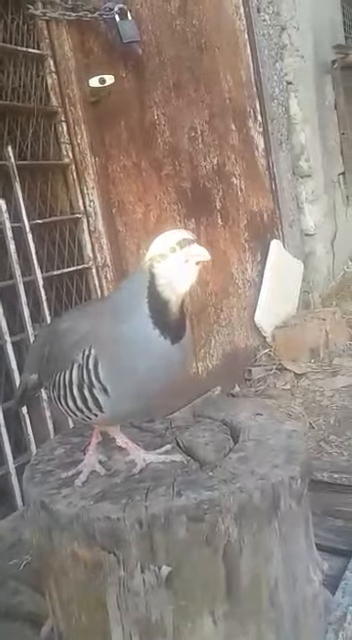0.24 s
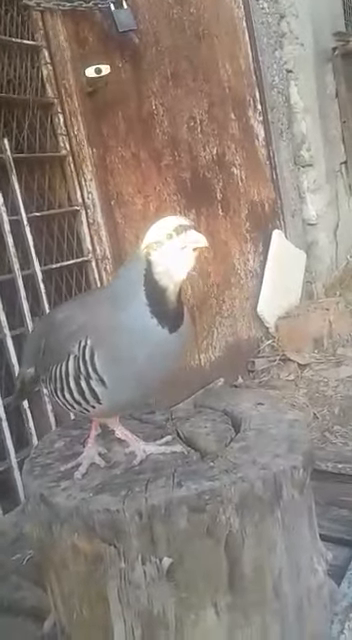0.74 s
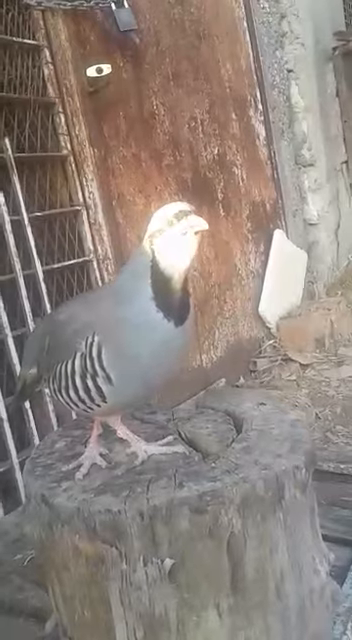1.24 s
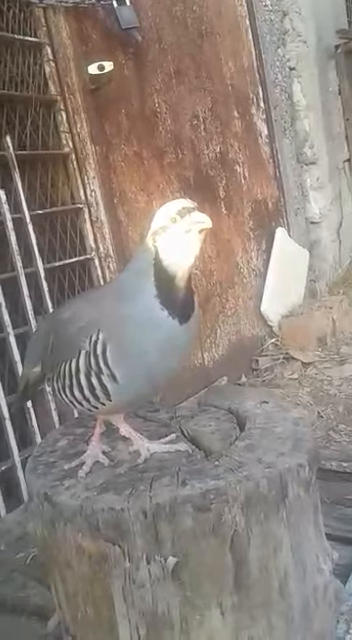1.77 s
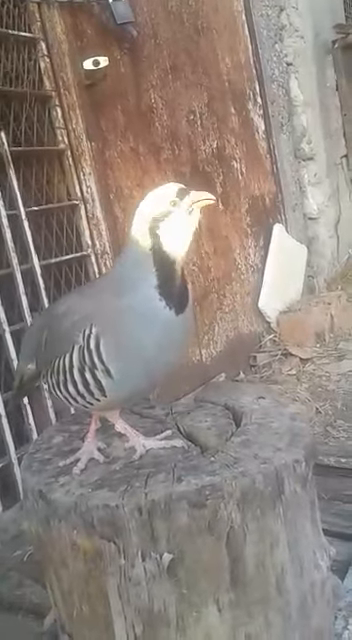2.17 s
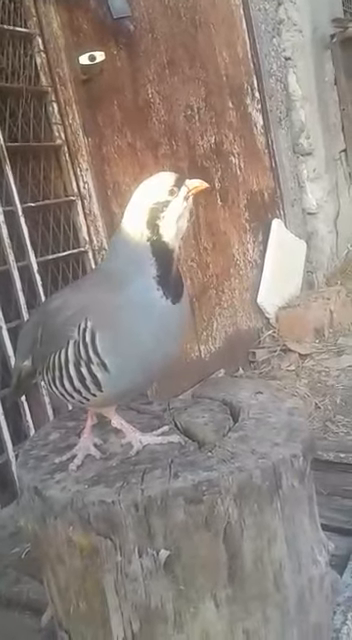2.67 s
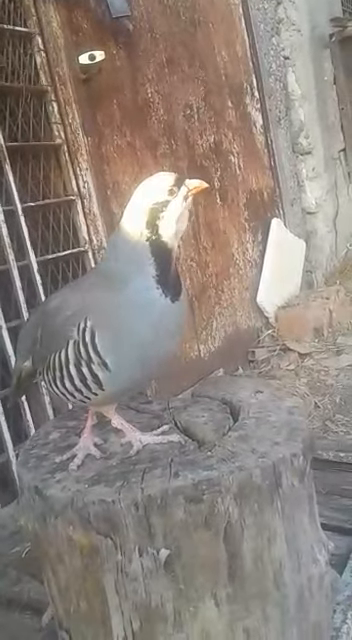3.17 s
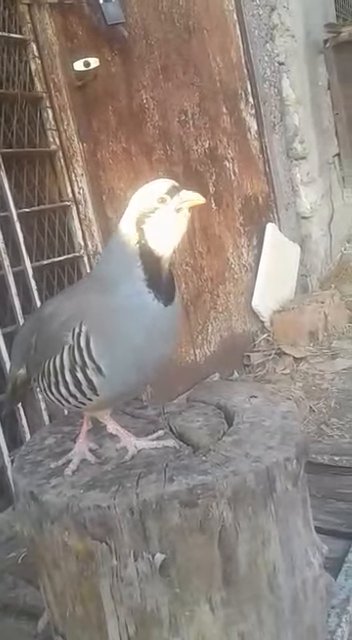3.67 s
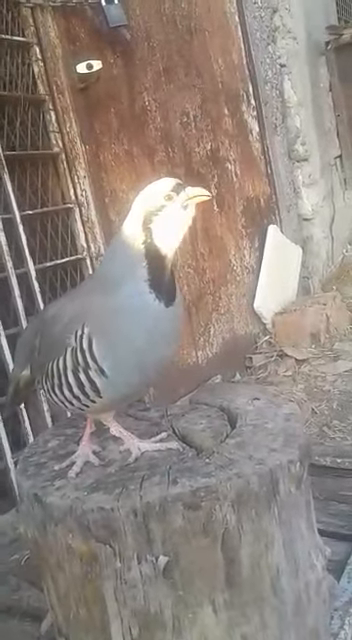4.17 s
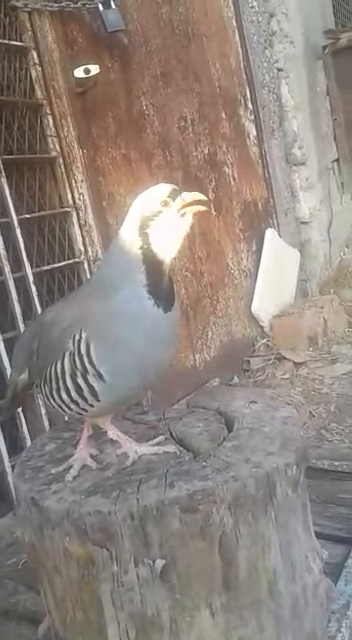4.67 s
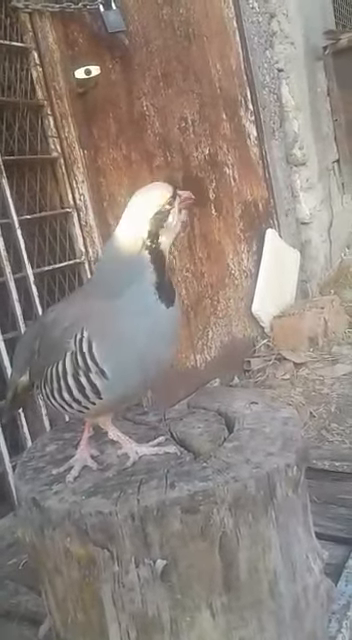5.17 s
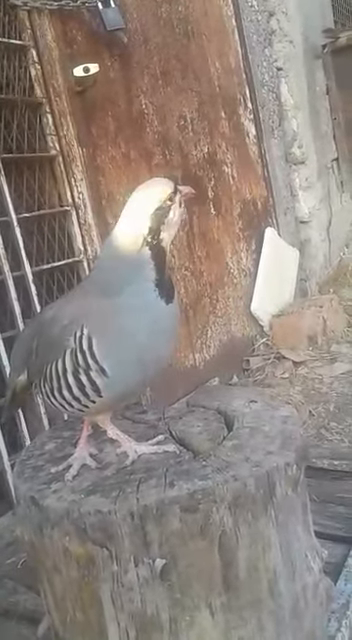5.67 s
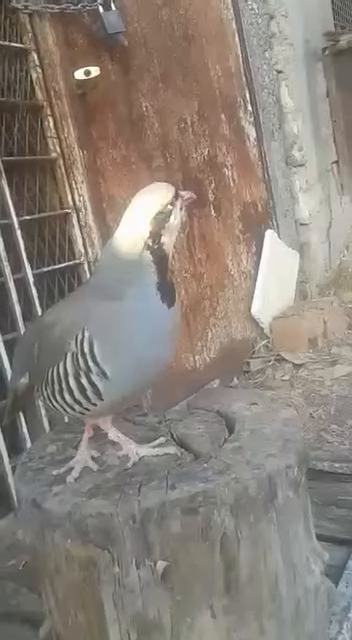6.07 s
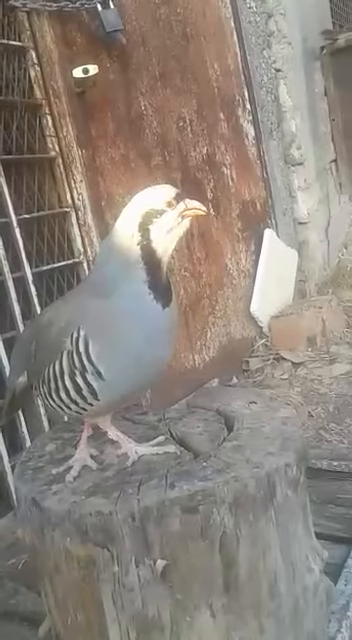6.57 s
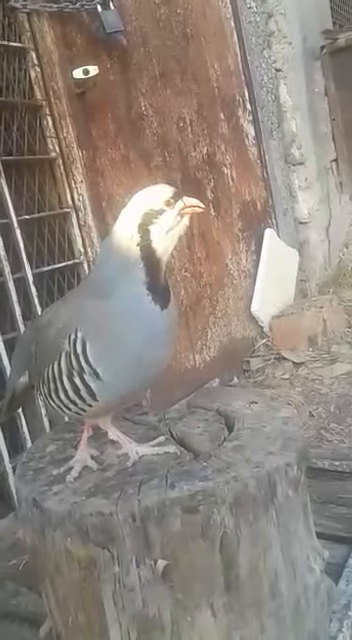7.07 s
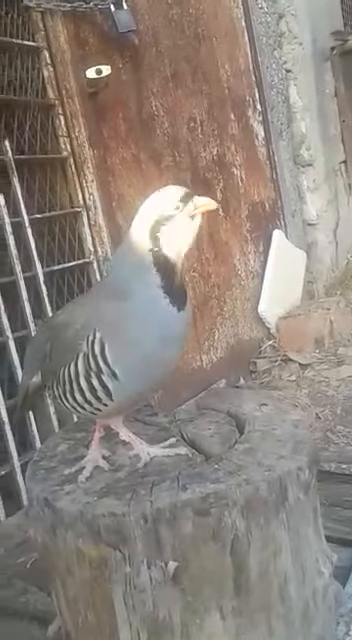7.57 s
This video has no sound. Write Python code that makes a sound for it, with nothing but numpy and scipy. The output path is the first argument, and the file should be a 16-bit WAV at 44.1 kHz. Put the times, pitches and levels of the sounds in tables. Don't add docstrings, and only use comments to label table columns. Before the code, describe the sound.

A partridge on a stump close to the microphone calls throughout: a soft hoot, then repeating groups of low cluck, swelling throaty roll and sharp cracked kick, broken twice by rows of clear, even chucks. A hoarse bird rasps in the distance, mostly in the first half. A hinge creaks faintly midway and thin chirps come later. The small walled yard echoes briefly above traffic rumble and far engines, with one knock on the microphone near the end.

```python
import sys
import numpy as np
from scipy import signal
from scipy.io import wavfile
from scipy.ndimage import uniform_filter1d

SR = 44100
rng = np.random.default_rng(int(sys.argv[2]) if len(sys.argv) > 2 else 0)


def put_to_file(sound):
    columns = np.atleast_2d(sound).T
    safe = np.clip(columns, -1, 1)
    whole_steps = np.round(safe * 32767)
    wavfile.write(sys.argv[1], SR, whole_steps.astype(np.int16))


def rack_gain(trim_db):
    fader = np.asarray(trim_db, float)
    return 10 ** (fader / 20)


N = 345303

# (low edge [Hz], high edge [Hz])
TOP_BAND = (10000, 15900)
ROLL_HZ = 336.5


def rms_one(x):
    return x / np.sqrt(np.mean(x ** 2) + 1e-20)


def add(track, s, sound):
    at = int(round(s * SR))
    track[at:at + len(sound)] += sound[:N - at]


def band(x, low_hz, high_hz, order=2):
    return signal.sosfilt(signal.butter(order, [low_hz, high_hz], "band", fs=SR, output="sos"), x)


def resonance(x, hz, width_hz):
    r = np.exp(-np.pi * width_hz / SR)
    section = [(1 - r * r) / 2, 0, (r * r - 1) / 2, 1, -2 * r * np.cos(2 * np.pi * hz / SR), r * r]
    return signal.sosfilt([section, section], x)


def drift(rate):
    knots = rng.standard_normal(int(N / SR * rate * 2) + 2)
    return np.interp(np.arange(N) / SR * rate * 2, np.arange(len(knots)), knots)


def swell(size, rise, sharp):
    return np.sin(np.pi * np.linspace(0, 1, size) ** rise) ** sharp


def background():
    # (frequency [Hz], level [dB per Hz])
    floor = [(18, -48), (30, -14), (86, -4), (199, -11), (426, -12), (526, -13.5), (666, -7.5), (801, -24),
             (1190, -6.5), (2410, -27.5), (2750, -39.5), (4530, -34), (5310, -45.5), (8300, -57.5),
             (16000, -47)]
    hz, floor_db = np.transpose(floor)
    rumble, white = 0, rng.standard_normal((2, N))
    edges = np.geomspace(34, 16000, 36)
    for k, (low, high) in enumerate(zip(edges, edges[1:])):
        gain_db = np.interp(np.log(low * high) / 2, np.log(hz), floor_db)
        wavering = rack_gain(gain_db + 0.26 * drift(3.7))
        rumble = rumble + wavering * band(white[k % 2], low, high, order=3)
    microphone_hiss = rms_one(band(white[1], *TOP_BAND, order=4))
    return rack_gain(-41) * rms_one(rumble) + rack_gain(-78.5) * microphone_hiss


def engines():
    # (level [dB], path of (time [s], firing rate [Hz]))
    engine_paths = [
        (-60, [(-.2, 102), (1.5, 142)]),
        (-63, [(-.2, 82), (.85, 103)]),
        (-62, [(.95, 45), (1.3, 68), (2.0, 79), (2.8, 60)]),
        (-60, [(3.2, 100), (3.6, 110), (4.15, 77), (5.5, 85), (8.0, 93)]),
        (-61, [(4.1, 46), (4.8, 61), (6.3, 68), (8.0, 65)]),
    ]
    fade_s, octave_db = 0.2, -5
    out, t = 0, np.arange(N) / SR
    for level_db, path in engine_paths:
        times, hz = np.transpose(path)
        phase = 2 * np.pi * np.cumsum(np.interp(t, times, hz)) / SR
        fade = np.clip(np.minimum(t - times[0], times[-1] - t) / fade_s, 0, 1)
        level = rack_gain(level_db + 9.5 + 2 * drift(2))
        octave = rack_gain(octave_db + 3 * drift(1.5)) * np.sin(2 * phase)
        out = out + level * fade * (np.sin(phase) + octave)
    return out


def syrinx(pitch, rough, breath_db):
    chance = rng.standard_normal((3, len(pitch)))
    wobble = rms_one(signal.lfilter([1], [1, -.985], chance[0]))
    cycles = np.cumsum(pitch * np.exp(.4 * rough * wobble)) / SR
    sizes = rack_gain(5 * rough * chance[1][cycles.astype(int)])
    pulses = np.exp(250 * (np.cos(2 * np.pi * cycles - np.pi) - 1))
    puffs = rack_gain(breath_db) * chance[2] * np.exp(-3 * (cycles % 1))
    return sizes * pulses, sizes * puffs


def far_bird():
    # (time [s], peak level [dB], throat resonance [Hz], length [s])
    rasps = [(0.0094, -41.5, 1734, 0.014), (0.144, -39, 1487, 0.045), (0.178, -35, 1322, 0.039),
             (0.393, -31.5, 1664, 0.078), (0.4694, -40, 1410, 0.032), (0.981, -24.5, 1536, 0.023),
             (1.29, -34, 1660, 0.016), (1.304, -32, 1270, 0.076), (1.514, -30.5, 1614, 0.056),
             (1.5514, -32, 1553, 0.057), (1.717, -40, 1884, 0.022), (1.838, -34.5, 1735, 0.015),
             (2.097, -22, 1404, 0.059), (2.475, -35, 1287, 0.045), (2.695, -33.5, 1794, 0.029),
             (2.715, -36, 1797, 0.098), (3.7244, -32, 1210, 0.052), (3.7723, -34.5, 1340, 0.022),
             (5.95, -42, 1723, 0.024)]
    out = np.zeros(N)
    for s, level_db, hz, length in rasps:
        size = int(length * SR)
        pulses, puffs = syrinx(np.linspace(hz / 3.5, hz / 4.6, size), rough=.1, breath_db=-20)
        source = swell(size, rise=.7, sharp=1.3) * (pulses + puffs)
        rasp = resonance(source, hz, width_hz=450) + .6 * resonance(source, .76 * hz, width_hz=350)
        distant = rms_one(band(rasp, 950, 2200, order=3))
        edge = rms_one(band(source, 3200, 5800))
        add(out, s, rack_gain(level_db + 2.5) * (distant + rack_gain(-33) * edge))
    return out


def flips(t):
    # (time [s], top pitch [Hz])
    breaks = [(0.288, 442), (0.389, 460), (0.842, 521.5), (0.913, 511), (0.944, 526), (1.374, 579),
              (1.415, 471), (1.45, 504.4), (1.907, 532), (2.976, 500), (3.043, 550), (3.53, 588),
              (3.647, 540), (4.077, 526), (4.145, 481), (5.209, 550.5), (5.235, 610.6), (5.327, 549),
              (5.814, 475.5), (5.854, 455.6), (6.291, 604.6), (6.387, 552.4), (7.55, 469), (7.634, 587)]
    rise_s, fall_s = 0.0065, 0.008
    lift, broken = 0, 0
    for s, top_hz in breaks:
        flip = np.exp(-((t - s) / np.where(t < s, rise_s, fall_s)) ** 2)
        lift = np.maximum(lift, (top_hz - ROLL_HZ) * flip)
        broken = np.maximum(broken, flip)
    return lift, broken


def throat_and_windpipe(voice, throat, beak_db):
    # (resonance [Hz], width [Hz], level against the throat [dB])
    low_tract = [(800, 300, -8), (1385, 170, -6), (1630, 220, -20), (2000, 300, -25), (2480, 300, -23),
                 (2820, 200, -30)]
    body, step = np.zeros(len(voice) + 2000), 400
    for at in range(0, len(throat) + step, step):
        near = np.arange(max(at - step, 0), at + 3 * step)
        piece = np.take(voice, near, mode="clip") * np.clip(1 - abs(near - at) / step, 0, 1)
        throat_hz = throat[min(at, len(throat) - 1)]
        body[near] += resonance(piece, throat_hz, width_hz=400)
        for hz, width_hz, db in low_tract:
            side = -1 if abs(hz - throat_hz) > 150 else 1
            upper = 1100 < hz < 2300 or hz > 2700
            body[near] += side * rack_gain(db + beak_db * upper) * resonance(piece, hz, width_hz)
    return body[:len(voice)]


def voice_note(pitch, shape, throat, rough, strain, beak_db, level_db):
    # (resonance [Hz], width [Hz], level against the throat [dB])
    high_tract = [(3706, 370, -28), (4075, 250, -23), (4430, 287, -20.5), (4770, 33, -24.5),
                  (5240, 82, -40), (6935, 380, -45)]
    # (centre [Hz], width [Hz], level against the throat [dB])
    top_hiss = [(11100, 570, -46.5), (12100, 800, -44), (15300, 1100, -43.5)]
    pulses, puffs = syrinx(pitch, rough, breath_db=-2)
    hoarse = np.mean(rough)
    breath = np.sqrt(hoarse + 0.061 * (hoarse > .05)) * puffs
    tail = np.zeros(800)
    voice = np.concatenate([shape * pulses, tail])
    airy = np.concatenate([shape ** 1.94 * (pulses + breath), tail])

    body = throat_and_windpipe(voice, throat, beak_db)
    body = band(band(body, 100, 1700, order=1), 590, 2950, order=4)
    chest_db = -14.5 - 1.3 * strain - 0.63 * (level_db + 13)
    chest = rack_gain(chest_db) * band(voice, 235, 560, order=3)
    edge = sum(rack_gain(db) * resonance(airy, hz, width_hz) for hz, width_hz, db in high_tract)
    air = band(airy, *TOP_BAND, order=4)
    hiss = sum(rack_gain(db) * resonance(air, hz, width_hz) for hz, width_hz, db in top_hiss)

    open_khz = throat[-1] / 1000
    shrill_db = 2 + 14 * (open_khz - 1.1) + 0.1 * (level_db + 13)
    hiss_db = .45 * (level_db + 10) + 16.5 * (open_khz - 1.27)
    upper = band(edge, 2900, 8900, order=5) + rack_gain(hiss_db) * hiss
    note = chest + body + rack_gain(shrill_db) * upper
    loudest = np.sqrt(uniform_filter1d(note ** 2, size=300).max())
    return rack_gain(level_db + 3.5) * note / loudest


def arch(u, start, end):
    rising, falling = np.clip(1 - u / .45, 0, 1), np.clip((u - .45) / .55, 0, 1)
    return 1 + (start - 1) * rising ** 2 + (end - 1) * falling ** 2


def cracked(u, start, end):
    top, crack = 0.36, 0.94
    after = np.clip((u - top) / (1 - top), 0, 1)
    lower = crack + (end - crack) * after + (1 - crack) * np.exp(-after / .12)
    return np.where(u < top, start + (1 - start) * u / top, lower)


def short_notes():
    # (start / main pitch [ratio], end / main pitch [ratio], throat at the start / settled [ratio],
    # hoarseness [0-1], place of the swell [exponent], its sharpness [exponent], upper resonances [dB])
    hoot = (1.01, .97, 1.01, 0.024, 0.98, 1.96, -1.5)
    kick = (.6, .56, 1.15, .06, 0.74, 1.33, 4.7)
    cluck = (1.8, 0.0069, 1.01, .06, 0.52, 0.98, -2.9)
    chuck = (.8, 0.49, 1.1, 0.036, 0.73, 0.89, 1.8)
    # (time [s], length [s], main pitch [Hz], throat [Hz], level [dB])
    hoots = [
        (0.062, 0.038, 406.2, 887, -14),
    ]
    kicks = [(0.598, 0.039, 696.5, 884, -14.5), (1.132, 0.031, 662.6, 910, -11.5),
             (1.653, 0.04, 683.4, 952, -11), (2.747, 0.037, 677, 886, -16.5),
             (3.284, 0.038, 685, 951.6, -14), (3.836, 0.032, 683.6, 944, -11.5),
             (4.36, 0.045, 687, 1065, -9.5), (4.975, 0.043, 695, 951, -14), (5.531, 0.048, 693, 951, -12.5),
             (6.081, 0.041, 681, 906, -13), (7.314, 0.04, 684, 843, -15)]
    clucks = [(0.261, 0.067, 332, 910, -25), (0.725, 0.043, 309.7, 890, -23.5),
              (1.259, 0.043, 328, 939, -22.5), (1.783, 0.033, 376.7, 906, -17.5),
              (2.867, 0.042, 320, 860, -24.5), (3.411, 0.04, 362.6, 914, -21.5),
              (5.1, 0.046, 323, 870, -22.5), (7.437, 0.045, 321, 802, -24.5)]
    chucks = [(2.11, 0.043, 397, 1190, -11.5), (2.259, 0.047, 403, 1221, -10.5),
              (2.416, 0.051, 397.8, 1230, -12.5), (2.576, 0.056, 405.2, 1210, -11),
              (3.956, 0.032, 505.6, 900, -17), (4.467, 0.027, 347.8, 1156, -15.5),
              (5.657, 0.037, 440, 860, -18), (4.647, 0.05, 415, 1210, -10.5),
              (4.806, 0.058, 412.3, 1200, -11), (6.199, 0.03, 475.7, 880, -17),
              (6.619, 0.053, 405, 1166, -12), (6.804, 0.055, 417.2, 1210, -10.5),
              (6.969, 0.045, 413.7, 1230, -10.5), (7.135, 0.061, 428, 1235, -11)]
    out = np.zeros(N)
    for kind, notes in [(hoot, hoots), (kick, kicks), (cluck, clucks), (chuck, chucks)]:
        start, end, opening, hoarse, rise, sharp, beak_db = kind
        is_kick = notes is kicks
        contour = cracked if is_kick else arch
        for s, length, hz, throat_hz, level_db in notes:
            size = int((length + 0.0034) * SR)
            u = np.linspace(0, 1, size)
            pitch = hz * contour(u, start, end) + flips(s + u * length)[0]
            strain = 0.3 if is_kick else np.clip((hz - 430) / 250, 0, .7)
            rough = hoarse + strain * np.clip((u - .25) / 0.077, 0, 1)
            throat = throat_hz * (1 + (opening - 1) * np.clip(1.3 - u / 0.2, 0, 1))
            shape = swell(size, rise, sharp)
            add(out, s - .002, voice_note(pitch, shape, throat, rough, strain, beak_db, level_db))
    return out


def rolls():
    # (time [s], length [s], opening level [dB], closing level [dB], throat at the close [Hz])
    breaths = [(0.34, 0.12, -14.5, -15.5, 940), (0.801, 0.17, -13.5, -9.5, 1055),
               (1.336, 0.15, -18, -11, 1154), (1.862, 0.074, -15, -11, 1100), (2.944, 0.2, -20, -14, 1090),
               (3.497, 0.18, -13.5, -9.5, 1155), (4.04, 0.137, -17, -10.5, 1180),
               (5.187, 0.207, -16.5, -9.5, 1180), (5.739, 0.158, -21.5, -11.5, 1115),
               (6.27, 0.15, -19, -11, 1112), (7.513, 0.222, -19.5, -13, 1154)]
    # (time [s], length [s], pitch bent towards [Hz], level change [dB])
    pushes = [(0.36, .025, 507, 2.5), (0.433, .09, 292.2, -1), (0.818, 0.032, 482.3, -1.5),
              (0.867, .04, 437, -15.5), (1.391, 0.023, 457.6, -0.5), (1.88, 0.021, 504, 2),
              (1.915, 0.027, 475.3, 2.5), (2.975, 0.029, 463.5, 2), (3.003, 0.023, 440, -8),
              (3.116, 0.023, 389.2, 3.5), (3.502, 0.027, 345, -7), (3.553, .07, 461.8, -4.5),
              (3.605, 0.025, 511, -1), (4.063, 0.028, 487, 3), (4.103, 0.018, 392.6, -12.5),
              (4.114, .025, 452.3, 2.5), (4.154, 0.037, 412, 4), (5.25, 0.03, 385.5, -7.5),
              (5.301, .035, 440, 2.5), (5.369, 0.043, 401, 2), (5.767, 0.037, 496, 4.5),
              (5.81, 0.042, 418, -4.5), (5.87, .04, 420, 2.5), (6.317, .03, 498.4, -3),
              (6.343, 0.013, 345, -8), (6.359, .025, 502, 0), (6.396, 0.021, 493, 2),
              (7.561, 0.032, 483.3, 1.5), (7.698, 0.041, 401.8, 4)]
    start_hz, end_hz, opening_throat_hz = 440, 255.3, 860
    settle_s, drop_s, attack_s, release_s = 0.01, 0.037, 0.0093, 0.016
    out = np.zeros(N)
    for s, length, opening_db, closing_db, throat_hz in breaths:
        t = np.arange(int(length * SR)) / SR
        lift, broken = flips(s + t)
        lift = np.maximum(lift, (start_hz - ROLL_HZ) * np.exp(-t / settle_s))
        level_db = opening_db + (closing_db - opening_db) * np.clip(t / (length - .025), 0, 1)
        sag = 0
        for at, wide, top_hz, lift_db in pushes:
            push = np.exp(-(2 * (s + t - at) / wide) ** 2)
            level_db = level_db + lift_db * push
            bend = (top_hz - ROLL_HZ) * push
            lift, sag = np.maximum(lift, bend), np.minimum(sag, bend)
        dropping = np.clip(1 - (length - t) / drop_s, 0, 1) ** 2
        pitch = (ROLL_HZ + lift + sag) * (1 - dropping) + end_hz * dropping
        attack = np.clip(t / attack_s, 0, 1) ** 0.43
        release = np.clip((length - t) / release_s, 0, 1) ** 0.91
        loudest_db = level_db.max()
        shape = attack * release * rack_gain(level_db - loudest_db)
        throat = opening_throat_hz + (throat_hz - opening_throat_hz) * (t / length) ** 1.2
        rough = .07 + .35 * broken
        note = voice_note(pitch, shape, throat, rough, strain=0, beak_db=-10.5, level_db=loudest_db - 4.5)
        add(out, s, note)
    return out


def partridge():
    return short_notes() + rolls()


def yard(x):
    # (frequency [Hz], level [dB], 60 dB decay [s])
    modes = [(1040, -36, .14), (1130, -34, .14), (1207, -31, .15), (1375, -40, .1)]
    echo_t60_s = 0.19
    t = np.arange(int(.4 * SR)) / SR
    scatter = rng.standard_normal(len(t)) * (rng.random(len(t)) < .05) * (t > .005)
    coloured = band(scatter, 1000, 2400) + rack_gain(2.5) * band(scatter, 360, 7000, order=1)
    echoes = rack_gain(-29.0) * coloured * rack_gain(-60 * t / echo_t60_s)
    echoes[[round(.0042 * SR), round(.011 * SR)]] += rack_gain([-12, -15])
    rings = sum(rack_gain(db - 26.5 - 60 * t / t60) * np.sin(2 * np.pi * hz * t) for hz, db, t60 in modes)
    return signal.fftconvolve(x, echoes + rings)[:N]


def squeak():
    # (time [s], length [s], start pitch [Hz], end pitch [Hz])
    hinge = (3.448, .046, 1330, 1240)
    out, (s, length, start_hz, end_hz) = np.zeros(N), hinge
    size = int(length * SR)
    pulses, puffs = syrinx(np.linspace(start_hz, end_hz, size), rough=.08, breath_db=-8)
    creak = resonance(pulses, 1300, width_hz=330)
    creak += rack_gain(-30.5) * band(pulses + puffs, 2600, 8000)
    creak += rack_gain(-13) * band(puffs, 1700, 4100) + rack_gain(-33) * band(puffs, 8200, 14000)
    add(out, s, rack_gain(-34) * swell(size, rise=1.5, sharp=0.69) * rms_one(creak))
    return out


def chirps():
    # (time [s], level [dB], start pitch [Hz], end pitch [Hz], length [s])
    whistles = [
        (5.656, -46, 2340, 2860, 0.092),
        (6.099, -44.5, 2620, 3000, 0.12),
        (7.332, -32.5, 2590, 2370, 0.052),
    ]
    out, waver = np.zeros(N), drift(130)
    for s, level_db, start_hz, end_hz, length in whistles:
        size = int(length * SR)
        pitch = np.linspace(start_hz, end_hz, size) * (1 + .02 * waver[int(s * SR):][:size])
        phase = 2 * np.pi * np.cumsum(pitch) / SR
        whistle = np.sin(phase) + rack_gain(-16.5) * np.sin(2 * phase)
        add(out, s, rack_gain(level_db) * np.hanning(size) * whistle)
    return out


def tick():
    # (time [s], peak level [dB])
    knock = (7.0227, -2)
    out, t = np.zeros(N), np.arange(100) / SR
    push = -np.exp(-((t - .0003) / 0.00012) ** 2)
    rebound = 0.2 * np.exp(-((t - .0007) / 0.00066) ** 2)
    add(out, knock[0] - .0003, rack_gain(knock[1]) * (push + rebound))
    return out


def scene():
    near = partridge()
    far = far_bird() + chirps() + squeak()
    wet = yard(near + rack_gain(-2) * far)
    return (near + far + wet + tick() + background() + engines())[None]


def roll_off(x):
    return signal.sosfilt(signal.butter(12, 15830, fs=SR, output="sos"), x)


def record(dry):
    return roll_off(rack_gain(-6.0) * dry)


dry = scene()
out = record(dry)
put_to_file(out)
```